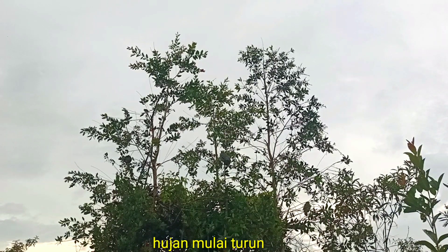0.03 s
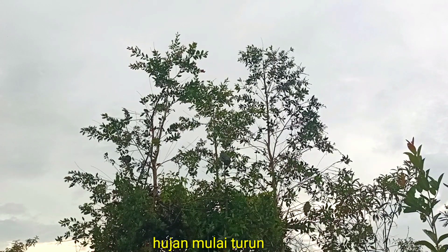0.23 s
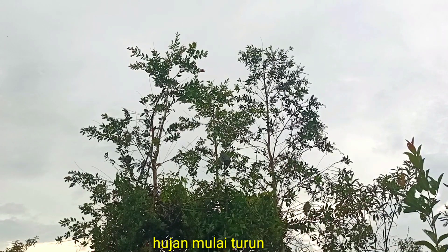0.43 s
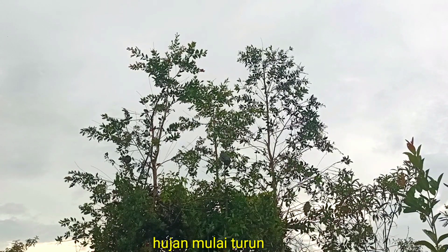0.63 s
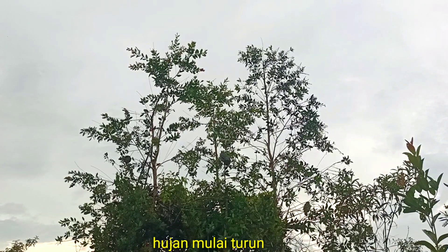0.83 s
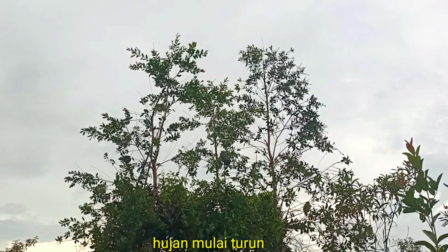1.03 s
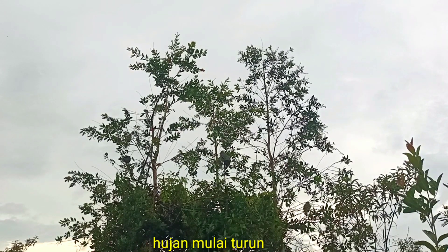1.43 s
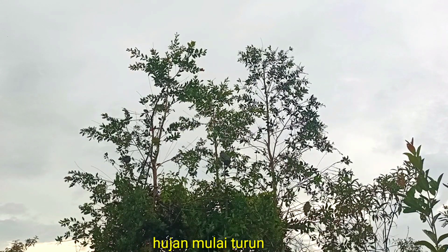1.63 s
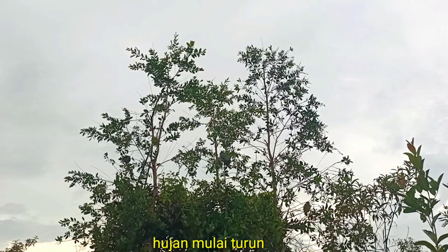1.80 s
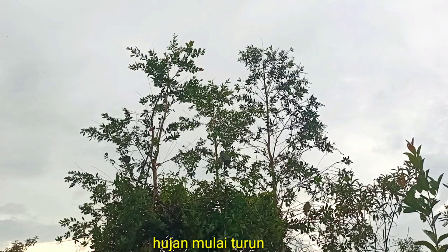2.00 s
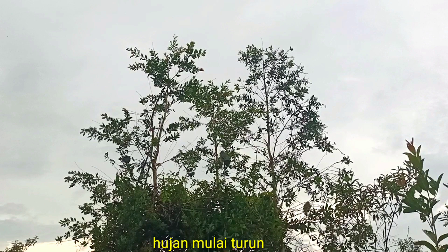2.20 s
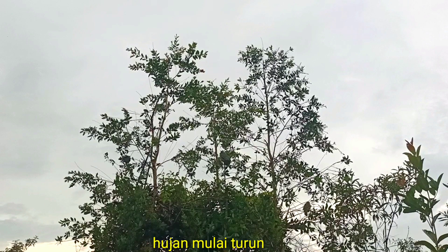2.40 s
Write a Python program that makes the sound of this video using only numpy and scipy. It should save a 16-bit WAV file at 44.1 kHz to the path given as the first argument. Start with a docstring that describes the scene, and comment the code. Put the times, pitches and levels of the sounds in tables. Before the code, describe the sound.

A bird gives three rattling croaks among trees. Each begins as a dry, rapid knocking that grows louder and merges into a harsh rasp, which quickens and dies away. The calls run from the start to 0.7 seconds, from 0.8 to 1.4, and from 1.6 to 2.4, loudest near their ends. Very faint high insect chirps and a low distant rumble continue behind.

```python
"""Croaking bird in the trees

A hidden bird gives three calls. Each starts as a dry rattle, about 29 knocks a second, each knock a few
pulses ringing in the throat. The knocks run together into a rasp whose pulses speed up, turn rough and
die away. Soft tones sound between some knocks, and branches scatter the calls back. Behind the bird are
two thinly chirping insects, a few ticks in the leaves and a faint low rumble."""
import sys
import numpy as np
from scipy import signal
from scipy.fft import rfft, irfft
from scipy.io import wavfile
from scipy.ndimage import uniform_filter1d

SR = 44100
rng = np.random.default_rng(int(sys.argv[2]) if len(sys.argv) > 2 else 0)


def unload_audio(sound):
    """Save the sound as a 16-bit wav file, at the path given as the first command line argument."""
    columns = np.transpose(np.atleast_2d(sound))
    # keep every value between -1 and 1, then stretch to whole-number steps
    steps = np.round(np.clip(columns, -1, 1) * 32767)
    wavfile.write(sys.argv[1], SR, steps.astype(np.int16))


N = 112454
FIRST_CALL_END_S = .75  # until here the bird faces another way, so its calls take a different colour
BREATH = 0.4  # air mixed into the pulses, per unit of roughness
WOBBLE_SHARE, WOBBLE_HZ = .015, 36.3  # waver in the tuning of the rasp's throat and the soft tones

# The knocks of the rattle. Each row: time in seconds, level in dB, width in seconds (scaled for attack
# and release), pulse rate in Hz, throat tuning in Hz, thump send in dB, hiss send in dB.
KNOCKS = [(0.002, -51, 0.006, 481, 1496, -6.5, -23), (0.0318, -43.5, 0.0012, 493, 1610, -16, -29.5),
          (0.047, -58.5, 0.0025, 515, 1930, 3, -25), (0.067, -46, 0.0019, 498, 1645, -4, -31.5),
          (0.1025, -53.5, 0.0016, 595, 1730, -15, -25), (0.1362, -43.5, 0.002, 483, 1746, -16.5, -39),
          (0.1704, -42, 0.0011, 505, 1820, -6, -41), (0.2048, -43, 0.0019, 574, 1740, -4, -39),
          (0.2384, -39.5, 0.0015, 525, 1870, -3.5, -30.5), (0.271, -40, 0.0016, 494, 1800, -9, -23.5),
          (0.305, -36, 0.0022, 538, 1770, -14.5, -34.5), (0.34, -37, 0.0016, 522, 1745, -12, -35),
          (0.3738, -41, 0.0021, 488, 1746, -13, -40), (0.407, -36, 0.0017, 634, 1722, -14, -30),
          (0.4408, -34, 0.0014, 583, 1695, -18.5, -29.5), (0.4563, -47, 0.00071, 563, 1600, -13, -26),
          (0.4753, -37, 0.0024, 700, 1770, -11, -27), (0.5058, -32, 0.003, 630, 1680, -19, -33),
          (0.5395, -35, 0.0024, 547, 1660, -13, -26.5), (0.581, -39, 0.0013, 594, 1720, -13, -37),
          (0.688, -53, 0.0016, 588, 1640, -12.5, -29), (0.806, -50.5, 0.002, 548, 1616, -12, -47),
          (0.8393, -49.5, 0.0017, 544, 1610, -9, -45), (0.874, -46.5, 0.0016, 545, 1590, -8, -34),
          (0.9085, -45.5, 0.0018, 564, 1550, -9, -42), (0.9448, -46.5, 0.0015, 513, 1550, -11.5, -30),
          (0.9809, -46.5, 0.0023, 556, 1520, -14.5, -40), (1.0135, -40.5, 0.0023, 572, 1670, -6, -33),
          (1.048, -40.5, 0.0015, 587, 1725, -4.5, -32.5), (1.0846, -44.5, 0.0025, 522, 1750, -4.5, -31),
          (1.1195, -42.5, 0.0023, 597, 1645, -9.5, -41), (1.1395, -47.5, 0.0018, 490, 1440, -13, -31),
          (1.1515, -34.5, 0.0019, 615, 1710, -16, -24.5), (1.162, -47, 0.00057, 594, 1600, -14, -24),
          (1.187, -43.5, 0.0025, 628, 2170, -8.5, -31), (1.2193, -34.5, 0.0031, 593, 1690, -16.5, -28.5),
          (1.255, -38, 0.0052, 595, 1590, -27, -20.5), (1.287, -34.5, 0.0039, 550, 1680, -22, -27.5),
          (1.341, -39.5, 0.0011, 580, 1790, -14.5, -20.5), (1.3774, -44.5, 0.0011, 593, 2150, -7, -35),
          (1.397, -41, 0.0025, 600, 1820, -22, -34), (1.4122, -43, 0.0011, 562, 1620, -10, -41),
          (1.4223, -49, 0.0025, 640, 1670, -8, -24), (1.6264, -58, 0.0019, 465, 1590, -7, -33),
          (1.6594, -47, 0.0026, 494, 1610, -6.5, -46), (1.695, -44, 0.0031, 500, 1580, -9.5, -31.5),
          (1.73, -45, 0.0018, 449, 1500, -9, -38), (1.764, -45, 0.0028, 538, 1764, -7, -39),
          (1.801, -38, 0.0022, 480, 1656, -11, -33.5), (1.835, -39, 0.0011, 492, 1654, -6.5, -36),
          (1.8716, -39, 0.0019, 500, 1830, -7, -30.5), (1.9052, -38.5, 0.002, 472, 1677, -10, -26),
          (1.941, -37.5, 0.0025, 590, 1660, -12, -30), (1.956, -45.5, 0.0022, 445, 1530, -13, -29),
          (1.974, -39, 0.0024, 584, 1710, -15, -50), (1.9866, -42.5, 0.0032, 457, 1515, -10.5, -38),
          (2.0108, -37, 0.0035, 603, 1650, -16, -41), (2.046, -37, 0.0025, 590, 1800, -15.5, -26.5),
          (2.0791, -34, 0.0027, 582, 1850, -16.5, -21.5), (2.115, -35.5, 0.0027, 601, 1670, -11.5, -24),
          (2.1495, -35, 0.00096, 583, 1730, -10.5, -18.5), (2.234, -36.5, 0.0011, 600, 1720, -14, -24),
          (2.31, -46, 0.0038, 530, 1710, -8, -32)]
# Throat EQ for the first call's knocks, then for the later ones, when tuned to THROAT_HOME_HZ.
# Each row: frequency in Hz, gain in dB.
FIRST_KNOCK_THROAT = [(300, -44.5), (930, -28), (1200, -16.5), (1480, 2), (1750, -2.5), (2000, 1),
                      (2400, -16.5), (2750, -18.5), (3200, -24), (3700, -45), (6000, -57.5)]
KNOCK_THROAT = [(300, -26), (880, -18.5), (1200, -17.5), (1500, 3), (1800, 2), (2150, -7.5), (2500, -10.5),
                (2950, -27), (3350, -23), (3800, -36.5), (6000, -76.5)]
THROAT_HOME_HZ = 1724
# EQ of the breath hiss on knocks and rasps. Each row: frequency in Hz, gain in dB.
HISS_EQ = [(2000, -33.5), (3500, -9), (4100, -15), (4650, -3.5), (5300, -5), (6100, -10), (6900, 4.5),
           (7200, -3.5), (7480, 0.5), (7900, -18.5), (9800, -14), (11500, -26), (15500, -38.5)]


def rattle():
    """Each knock is a few pulses through a falling throat, a low thump, a hiss and a faint after-buzz."""
    out = np.zeros(N)
    count = round(.04 * SR)
    t = (np.arange(count) - count // 2) / SR
    from_peak = t + 0.00079
    rough, voice_trim_db, thump_trim_db, hiss_trim_db = 0.23, -1.67, -0.95, -1.75
    for time_s, db, width_s, pulse_hz, throat_hz, thump_db, hiss_db in KNOCKS:
        pulses, puffs = syrinx(np.full(count, pulse_hz), rough, centred=True)
        gate = bell(from_peak, width_s * np.where(from_peak < 0, 0.72, 1.4))  # fast in, slower out
        after_buzz = amp(-22) * (from_peak > 0) * np.exp(-abs(from_peak) / 0.0087)
        drive = (gate + after_buzz) * (pulses + BREATH * rough * puffs)
        throat = FIRST_KNOCK_THROAT if time_s < FIRST_CALL_END_S else KNOCK_THROAT
        sag = 1 - .045 * np.tanh((t - .0005) / 0.0012)
        voice = unit_rms(moving_colour(drive, throat, throat_hz / THROAT_HOME_HZ * sag))
        thump_t = t - 0.002
        thump_hz = 560.6 * (1 + 0.042 * rng.standard_normal())
        thump = bell(thump_t, 0.0019) * np.cos(2 * np.pi * (thump_hz * thump_t + rng.random()))
        thump = amp(thump_db + thump_trim_db) * unit_rms(thump)
        hiss = colour(bell(t - .0016, 0.0028) * puffs, HISS_EQ)
        hiss = amp(hiss_db + hiss_trim_db) * unit_rms(hiss)
        add(out, time_s + t[0], amp(db) * (amp(voice_trim_db) * voice + thump + hiss))
    return out


# Automation for the rasps, one list a call. Each row: time in seconds, target pulse rate in Hz,
# level in dB, roughness from 0 to 1, low resonance send in dB, hiss send in dB.
RASPS = [
    [(.4845, 158.2, -35.5, 0.09, -17, -32), (.515, 229, -36.5, 0.29, -13, -36.5),
     (.545, 293.1, -36.5, 0.19, -11.5, -22), (.554, 318.9, -30, 0.06, -18.5, -39),
     (.573, 345, -24, 0.14, -27.5, -21), (.592, 410.8, -28, 0.53, -12.5, -26),
     (.609, 424.6, -26, 0.21, -26.5, -25.5), (.632, 577, -28.5, 0.2, -14.5, -47.5),
     (.665, 572, -32, 0.12, -12.5, -48), (.680, 556, -44.5, 0.47, -2, -21.5), (.686, 547, -49, 0, -20, -34)],
    [(1.170, 109.4, -42, 0.18, -11, -32), (1.197, 238.7, -40, 0.25, -10.5, -34),
     (1.232, 292.4, -36.5, 0.21, -12.5, -28), (1.270, 346.9, -33, 0.07, -21.5, -39),
     (1.297, 451.2, -31, 0.1, -17, -29.5), (1.318, 594, -27, 0.37, -11.5, -22.5),
     (1.332, 470.4, -29.5, 0.52, -16.5, -28), (1.355, 429.7, -32, 0.14, -13.5, -30),
     (1.385, 321.4, -37.5, 0.67, -10, -40), (1.405, 287.8, -46, 0.26, -5, -28),
     (1.430, 207, -58, 0.39, -8, -23)],
    [(2.018, 107.3, -49, 0.2, -11.5, -33.5), (2.060, 261.7, -38, 0.14, -9, -29.5),
     (2.100, 277.4, -38, 0.25, -16, -24), (2.140, 299.7, -35, 0.24, -15.5, -32.5),
     (2.172, 340.6, -30.5, 0.1, -18, -31), (2.200, 438.5, -27.5, 0.14, -26.5, -28.5),
     (2.228, 566.1, -27, 0.27, -11.5, -23), (2.255, 431.4, -29.5, 0.3, -18.5, -26.5),
     (2.285, 404.4, -37.5, 0.59, -4, -44), (2.315, 297, -47, 0.38, -4.5, -30),
     (2.355, 234.6, -63.5, 0.58, -14, -10)],
]
# Resting throat EQ for the first rasp, then for the later ones. Each row: frequency in Hz, gain in dB.
FIRST_RASP_THROAT = [(300, -44), (850, -25), (1150, -18.5), (1380, -5.5), (1480, -12), (1720, 6),
                     (1900, -8.5), (2200, -19.5), (2600, -15), (2850, -27.5), (3350, -19.5), (3800, -60.5),
                     (6000, -72.5)]
RASP_THROAT = [(300, -58.5), (850, -20), (1050, -19.5), (1200, -7.5), (1380, 4), (1520, -15), (1720, 4),
               (1880, 3), (2080, -24), (2500, -6), (2850, -31.5), (3150, -27), (3400, -15.5), (3800, -54),
               (6000, -67.5)]
# The low resonance that gives the rasp its body. Each row: frequency in Hz, gain in dB.
BODY_EQ = [(150, -48), (310, -57), (430, -4.5), (550, 4), (680, 1.5), (850, -21.5), (1200, -42.5),
           (3000, -75.5)]


def rasp(rows):
    """Pulses speed up in steps and fuse into a harsh croak, then flutter and fade."""
    times, *lanes = np.transpose(rows)
    t = np.arange(times[0], times[-1], 1 / SR)
    target_hz, db, rough, body_db, hiss_db = (np.interp(t, times, lane) for lane in lanes)
    tuning = 1 + .004 * np.maximum(db + 28, -12)  # the throat tightens with effort
    lock_hz = 1717  # each pulse waits a whole number of cycles of this resonance
    pulses, puffs = syrinx(lock_hz * tuning / np.round(lock_hz / target_hz), rough)
    drive = pulses + BREATH * rough * puffs
    throat = FIRST_RASP_THROAT if times[0] < FIRST_CALL_END_S else RASP_THROAT
    ring = moving_colour(drive, throat, tuning * (1 + WOBBLE_SHARE * wander(len(t), WOBBLE_HZ)))
    age = (t - t[0]) / 0.00077
    pulse_shape = age ** 2 * np.exp(-age)
    beat = steady(signal.fftconvolve(np.maximum(pulses, 0), pulse_shape)[:len(t)])
    voice = steady(ring * (.55 + .45 * beat), size=260)  # the ring is damped between pulses
    body = steady(colour(drive + 2.9 * puffs, BODY_EQ))
    hiss = steady(colour(beat ** 2 * puffs + 0.36 * pulses, HISS_EQ))
    past_peak = np.clip((t - t[np.argmax(db)]) / 0.11, 0, 1)
    depth_db = 2.5 * past_peak * np.minimum(rough / 0.38, 1)
    flutter_hz = 79.86 * (1 + 0.25 * wander(len(t), 36))
    flutter = amp(depth_db * np.sin(2 * np.pi * np.cumsum(flutter_hz) / SR))
    fade = np.clip((t[-1] - t) / 0.0039, 0, 1)
    return fade * amp(db) * (flutter * (voice + amp(hiss_db) * hiss) + amp(body_db) * body)


def syrinx(hz, rough, centred=False):
    """The bird's voice organ: uneven pulses, and the puffs of air that go with them."""
    count = len(hz)
    jitter, shimmer, jitter_hz = .35, 0.99, 203.8
    turns = np.cumsum(hz * np.exp(jitter * rough * wander(count, jitter_hz))) / SR
    if centred:  # a pulse lands just before the middle
        turns = turns - turns[count // 2] + .5 * rng.random()
    from_pulse_s = ((turns + .5) % 1 - .5) / hz
    pulses = bell(from_pulse_s, 2 / SR) * np.exp(shimmer * rough * wander(count, 2 * jitter_hz))
    puffs = (0.26 + np.exp(-(turns % 1) / 0.39)) * rng.standard_normal(count)
    return unit_rms(pulses - pulses.mean()), unit_rms(puffs)


# The soft tones. Each row: centre in seconds, half length in seconds, pitch in Hz, level in dB.
TONES = [(0.142, .006, 726, -46), (1.70, .016, 580, -56), (1.765, .035, 660, -57),
         (1.821, 0.026, 1230, -51.5), (1.997, .017, 610, -52), (2.541, .004, 1760, -54)]


def tones():
    """Soft, slightly wavering tones that sound on between knocks, and one last pip."""
    t = np.arange(N) / SR
    phase_per_hz = 2 * np.pi * np.cumsum(1 + WOBBLE_SHARE * wander(N, WOBBLE_HZ)) / SR
    return np.sqrt(2) * sum(amp(db) * np.exp(-((t - centre_s) / half_s) ** 2) * np.sin(hz * phase_per_hz)
                            for centre_s, half_s, hz, db in TONES)


# Reverb of the wood, longest in the highs. Each row: frequency in Hz, seconds to fall by 60 dB.
WOOD_DECAY = [(500, 0.11), (1600, 0.1), (4000, .3), (8000, 1)]


def trees(x):
    """Quick reflections from near branches and a faint tail from the wood."""
    t = np.arange(SR // 2) / SR
    taps_per_s, near_db, tail_db = 2000, -18.5, -34
    taps = rng.standard_normal((2, len(t))) * (rng.random((2, len(t))) < taps_per_s / SR) * (t > .003)
    hz, frame_s, bands = signal.stft(taps[0], SR, nperseg=256)
    decay = amp(-60 * frame_s / curve_at(WOOD_DECAY, hz)[:, None])
    tail = signal.istft(bands * decay, SR, nperseg=256)[1][:len(t)]
    near = taps[1] * np.exp(-t / 0.019) * np.exp(-(t / 0.041) ** 2)
    echo = amp(tail_db) * tail / np.linalg.norm(tail) + amp(near_db) * near / np.linalg.norm(near)
    return signal.fftconvolve(x, echo)[:N]


# The two nearer insects. Each row: pitch in Hz, spread in Hz, opening level in dB, closing level in dB,
# centre of the first chirp in seconds, half length of a chirp in seconds.
INSECTS = [(8637, 300, -76, -68, 0.11, .042), (9200, 80, -80, -77, 0.049, 0.04)]


def insects():
    """Two insects chirp about seven times a second, each in a narrow high band, and slowly grow louder."""
    t, out = np.arange(N) / SR, np.zeros(N)
    period_s = .138
    for hz, spread_hz, start_db, end_db, first_s, half_s in INSECTS:
        from_chirp_s = (t - first_s + period_s / 2) % period_s - period_s / 2
        gate = np.exp(-(from_chirp_s / half_s) ** 4)
        level = amp(np.linspace(start_db, end_db, N) + 2 * wander(N, 10))
        phase = 2 * np.pi * hz * t
        band = wander(N, spread_hz) * np.cos(phase) + wander(N, spread_hz) * np.sin(phase)
        out += level * gate * band
    return out


# Ticks in the leaves. Each row: start in seconds, level in dB, decay time in seconds.
LEAF_TICKS = [(.869, -61, 0.0068), (.895, -58, .003), (1.535, -69, 0.0022)]
# Their bright EQ. Each row: frequency in Hz, gain in dB.
LEAF_EQ = [(1500, -13), (4000, 1), (12000, 2)]


def leaf_ticks():
    """Tiny dry ticks in the leaves, each a fast-dying burst of noise."""
    out, t = np.zeros(N), np.arange(2048) / SR
    for start_s, db, decay_s in LEAF_TICKS:
        noise = unit_rms(colour(rng.standard_normal(len(t)), LEAF_EQ))
        add(out, start_s, amp(db) * np.exp(-t / decay_s) * noise)
    return out


# EQ of the ambience bed. Each row: frequency in Hz, gain in dB.
AIR_EQ = [(15, -31.5), (28, -6), (60, -4), (150, -0.5), (220, -10), (330, -24), (600, -21.5), (900, -27),
          (2000, -24.5), (3500, -28.5), (5500, -31.5), (6900, -26), (7900, -34), (9100, -21.5),
          (10000, -24.5), (11200, -35), (15500, -36.5)]


def air():
    """Distant rumble and the even hiss of far insects."""
    gain = amp(curve_at(AIR_EQ, np.fft.rfftfreq(N, 1 / SR)))
    level_db = -64.5 + 0.91 * wander(N, 11)
    return amp(level_db) * unit_rms(irfft(rfft(rng.standard_normal(N)) * gain, N))


def amp(db):
    """Decibels to gain."""
    return 10 ** (np.asarray(db) / 20)


def unit_rms(x):
    """Scales to rms 1."""
    return x / np.sqrt(np.mean(x ** 2) + 1e-20)


def bell(t, width):
    """A Gaussian envelope that peaks at t = 0."""
    return np.exp(-.5 * (t / width) ** 2)


def curve_at(points, hz):
    """Reads a table on a log-frequency axis."""
    f, value = np.transpose(points)
    return np.interp(np.log(hz + 1), np.log(f + 1), value)


def add(mix, start_s, sound):
    """Mixes a sound in from its start time."""
    at = round(start_s * SR)
    sound = sound[max(-at, 0):]
    part = mix[max(at, 0):][:len(sound)]
    part += sound[:len(part)]


def colour(x, eq, size=4096):
    """Minimum-phase EQ: it rings only after it is struck."""
    log_gain = np.log(amp(curve_at(eq, abs(np.fft.fftfreq(size, 1 / SR)))))
    ring = np.fft.ifft(np.exp(np.conj(signal.hilbert(log_gain)))).real[:size // 2]
    return signal.fftconvolve(x, ring)[:len(x)]


def moving_colour(x, eq, tuning):
    """An EQ whose resonances follow the ratio tuning: a faster clock raises them."""
    clock = np.cumsum(tuning)
    grid = np.arange(int(clock[-1]) + 2)
    return np.interp(clock, grid, colour(np.interp(grid, clock, x), eq))


def wander(count, hz):
    """Smooth random drift of rms 1, rolling off around hz."""
    f = np.fft.rfftfreq(count, 1 / SR)
    return unit_rms(irfft(rfft(rng.standard_normal(count)) * np.exp(-(f / hz) ** 2), count))


def steady(x, size=700):
    """Evens out the level over a few pulses."""
    power = uniform_filter1d(uniform_filter1d(x ** 2, size), size)
    return x / np.sqrt(abs(power) + 1e-4 * np.mean(x ** 2))


def scene():
    """The bird among the trees, over the background, in mono."""
    bird = rattle() + tones()
    for rows in RASPS:
        add(bird, start_s=rows[0][0], sound=rasp(rows))
    return (bird + trees(bird) + air() + insects() + leaf_ticks())[None]


def record(dry):
    """A steep high cut at 15.6 kHz."""
    high_cut = signal.firwin(511, 15600, window=("kaiser", 9), fs=SR)
    return signal.oaconvolve(dry, high_cut[None], "same")


dry = scene()
out = record(dry)
unload_audio(out)
```